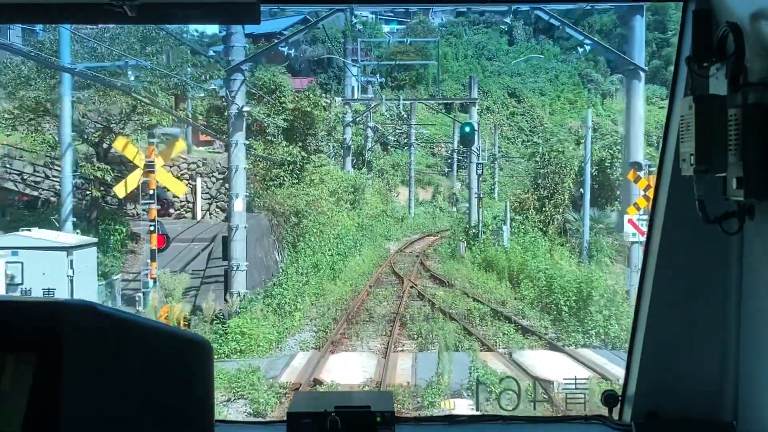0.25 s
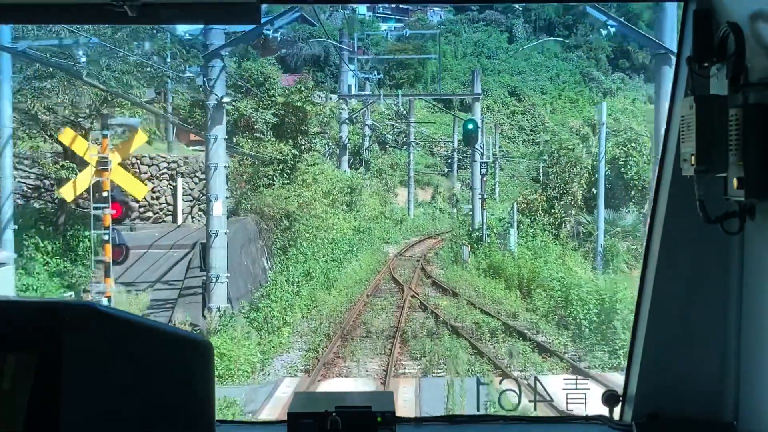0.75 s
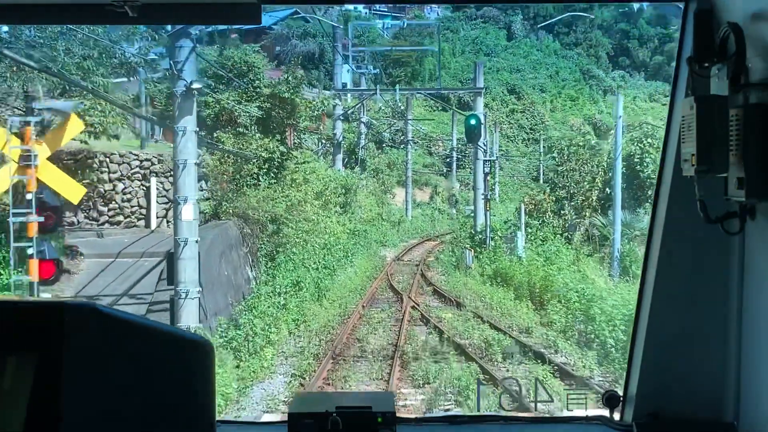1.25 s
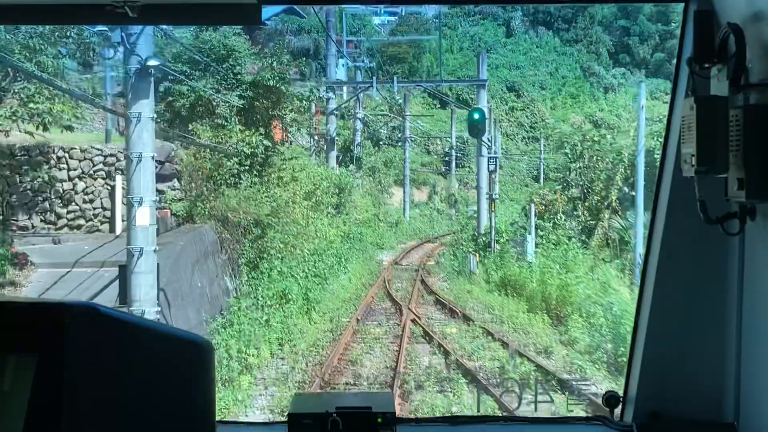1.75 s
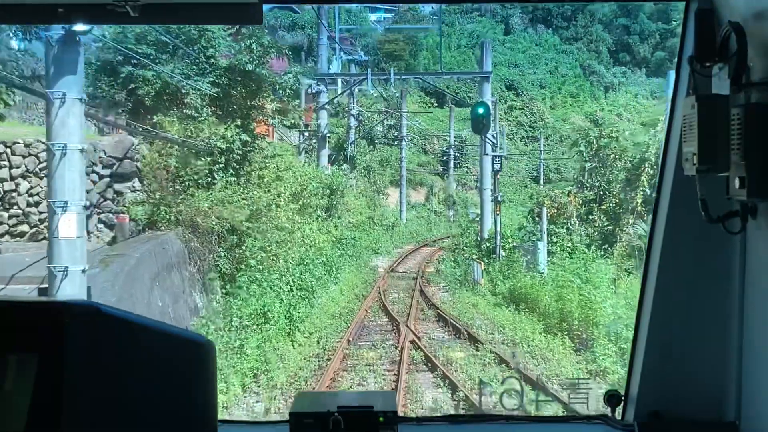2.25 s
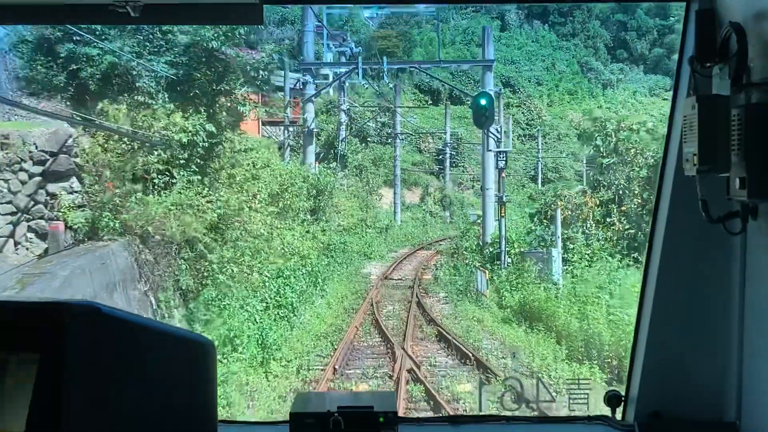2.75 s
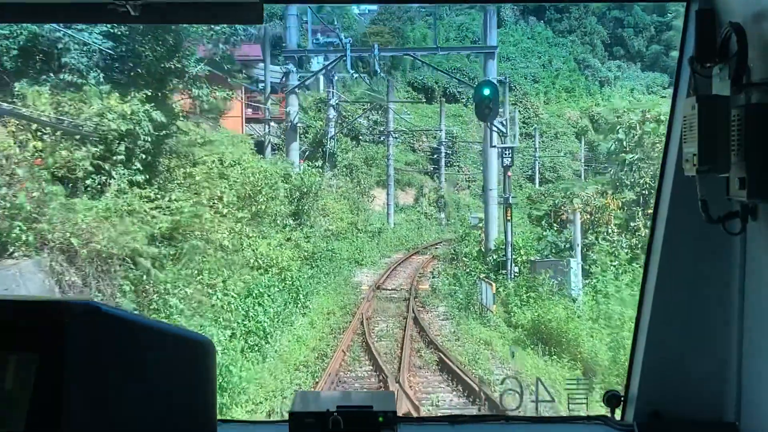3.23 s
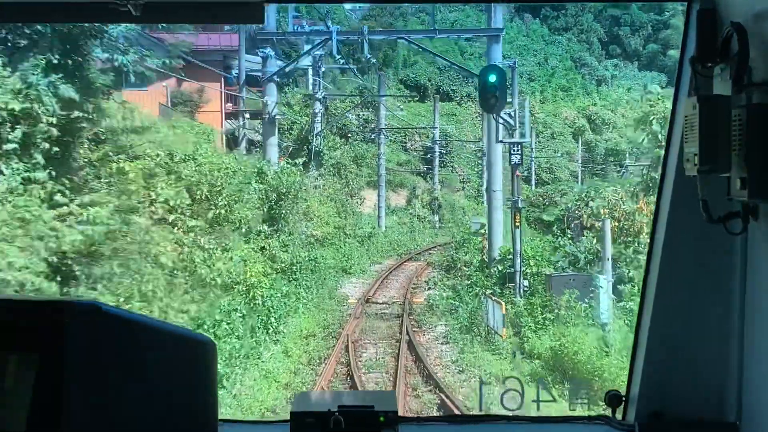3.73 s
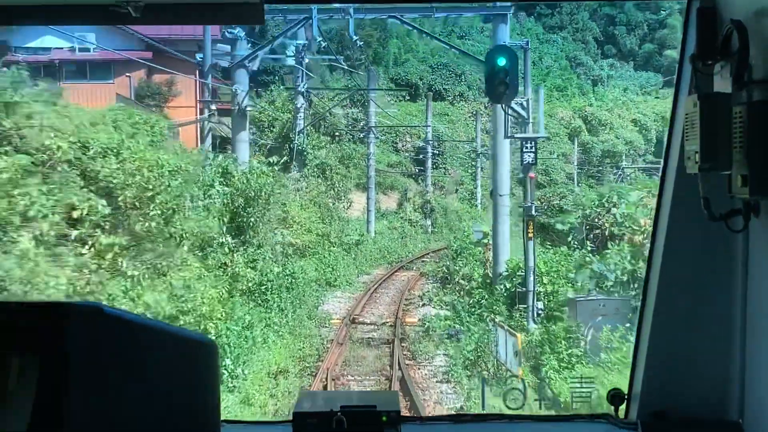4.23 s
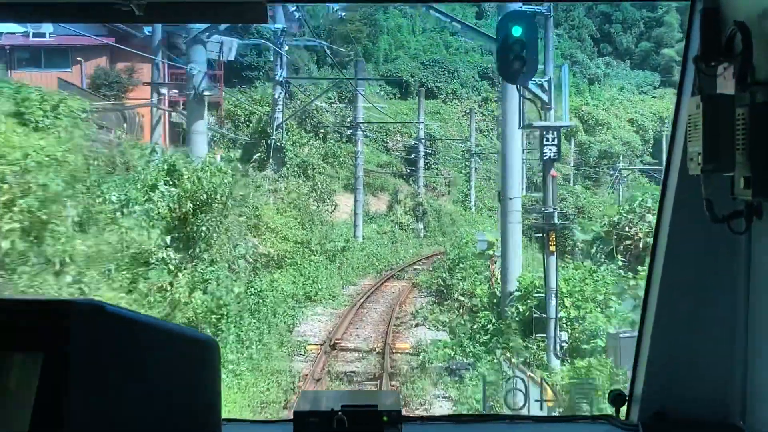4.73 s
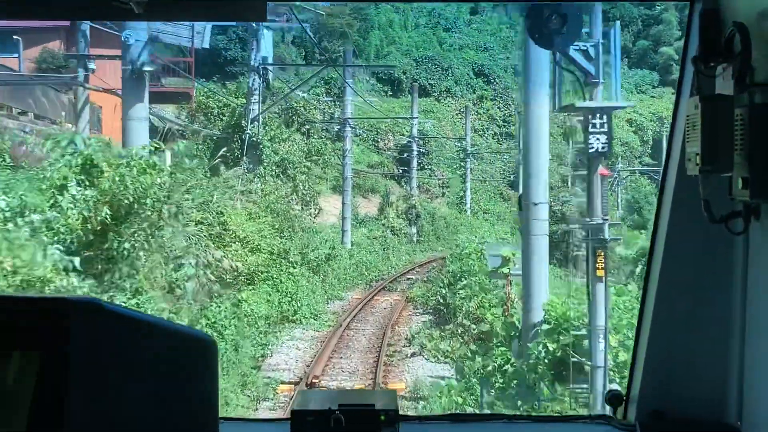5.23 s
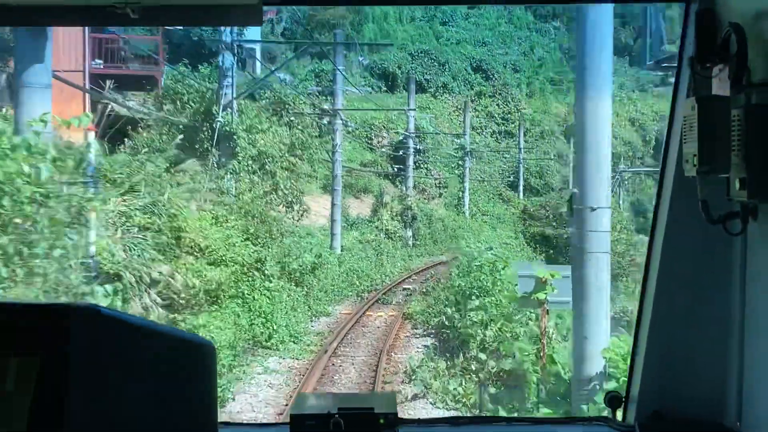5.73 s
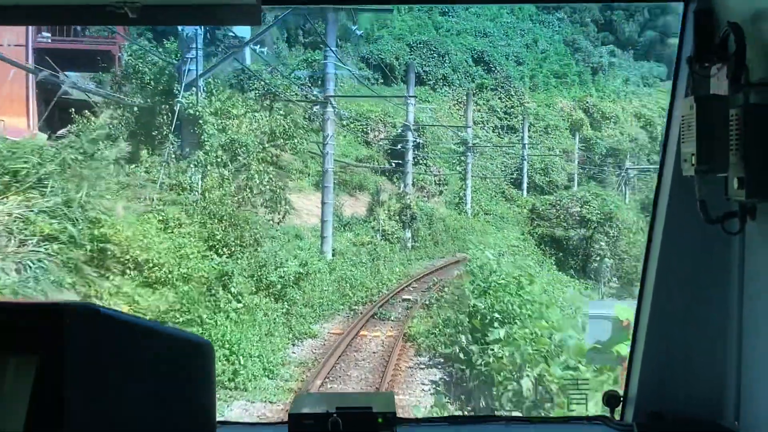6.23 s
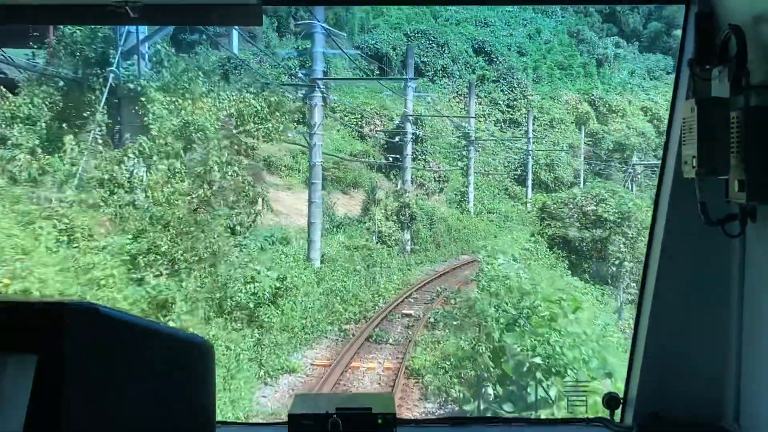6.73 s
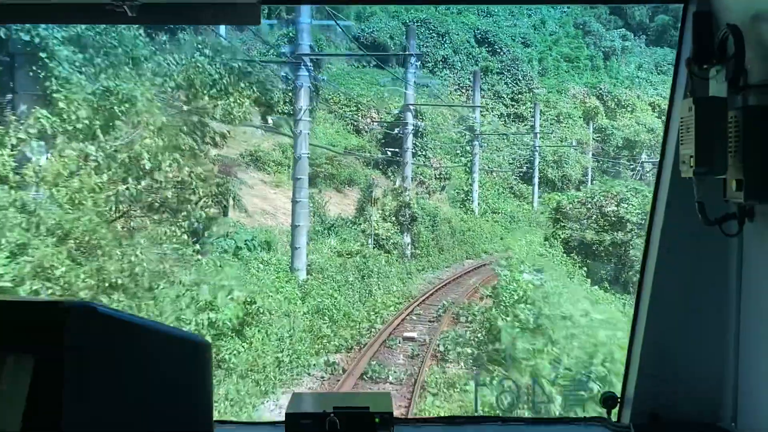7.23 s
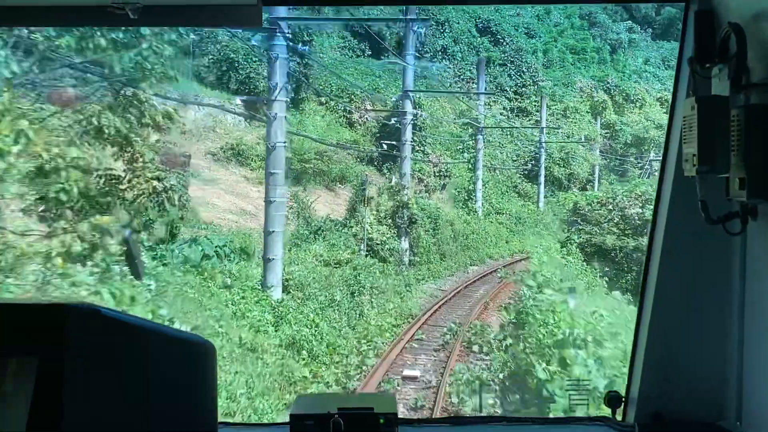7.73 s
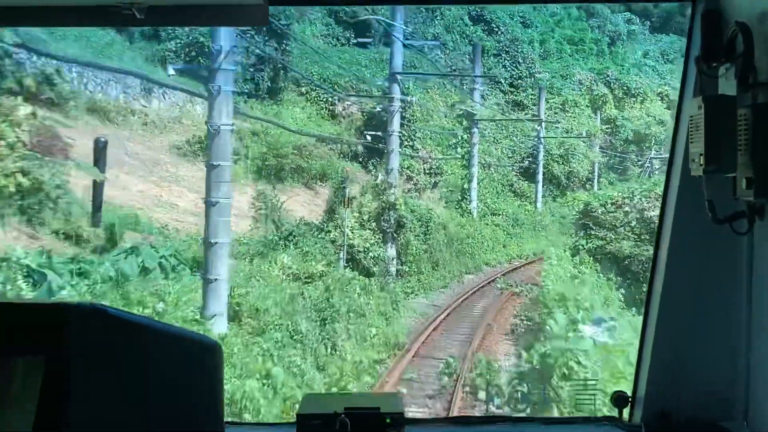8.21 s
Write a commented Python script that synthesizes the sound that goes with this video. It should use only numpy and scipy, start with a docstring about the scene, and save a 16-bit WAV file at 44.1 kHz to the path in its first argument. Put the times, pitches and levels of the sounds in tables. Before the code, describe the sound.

Inside a rolling train car, a steady low rumble and wheel roar, then heavy clunks, clatter and brief steel squeals as it crosses points.

```python
"""Inside the car behind the cab of an electric commuter train rolling over rail joints and points.
Shaped noise gives the floor boom, wheel roar, flange grinding and a thin hiss that comes and goes.
Shaken resonators give the frame shudder, the knock and wheel ring at each gap, and the whistles.
Damped sines thud in the floor; short noise snaps tick in the cab fittings."""
import sys
import numpy as np
from scipy import signal
from scipy.io import wavfile
from scipy.ndimage import uniform_filter1d

SR = 44100
rng = np.random.default_rng(int(sys.argv[2]) if len(sys.argv) > 2 else 0)


def waveform_to_disk(signal):
    """Save audio, clipped to [-1, 1], as 16-bit WAV at the path in sys.argv[1]."""
    frames = np.transpose(np.atleast_2d(signal))
    scaled = np.clip(frames, -1, 1) * 32767
    samples = np.round(scaled).astype(np.int16)
    wavfile.write(sys.argv[1], SR, samples)


N = 373527
FLOOR_HZ = 7000  # the floor muffles the blows above this


def gain_of(db):
    """Decibels to amplitude."""
    return 10 ** (np.asarray(db) / 20)


def evened(x):
    """Scales to rms 1."""
    return x / np.sqrt(np.mean(x ** 2) + 1e-20)


def read(points, hz):
    """Interpolates a spectrum table over log frequency."""
    point_hz, value = np.transpose(points)
    return np.interp(np.log(hz + 1), np.log(point_hz + 1), value)


def curve(rows, order):
    """Gain per sample from a dB column: -120 dB before the first row, last value held."""
    rows = np.array(rows)
    return gain_of(np.interp(np.arange(N) / SR, rows[:, 0], rows[:, order], left=-120))


# Likeness of the ears: hz, left_right_likeness
EAR_LIKENESS = [(60, 1), (130, 0.95), (270, 0.92), (520, 0.34), (850, 0.34), (1500, 0.08), (2200, 0.05),
                (3700, 0.053), (5300, 0.3), (6800, 0.77), (8300, 1), (12000, 1)]
# Level balance: hz, left_minus_right_db
EAR_BALANCE = [(60, -0.5), (130, -2.5), (270, 0.0), (560, 0.5), (1180, 3.5), (2470, 4), (5200, 0)]
# Phase between the ears: hz, right_against_left_rad
EAR_PHASE = [(150, 0), (420, -.4), (700, -.8), (1000, 1.4), (1500, 2.1), (2900, 3.8), (4200, 6.3),
             (5300, 9.4), (7200, 12.6), (9100, 15.7), (11200, 18.9), (13300, 22), (15300, 25.1)]


def noise(spectrum, patchy_db, modes=(), size=1024):
    """Stereo noise, mono sum at rms 1: a spectrum plus resonance peaks, with drifting patches."""
    hop = size // 2
    hz = np.fft.rfftfreq(size, 1 / SR)
    a, b, c, d, patches = rng.standard_normal((N // hop + 5, len(hz), 5)).T
    patches = uniform_filter1d(patches, size=8, axis=0)  # over frequency
    patches = evened(uniform_filter1d(patches, size=5, axis=1))  # over time
    power = gain_of(2 * read(spectrum, hz))
    for mode_hz, width_hz, db in modes:
        power = power + gain_of(2 * db) / (1 + (2 * (hz - mode_hz) / width_hz) ** 2) ** 2

    same = np.clip(read(EAR_LIKENESS, hz), -1, 1)[:, None]
    turn = np.exp(1j * read(EAR_PHASE, hz))[:, None]
    balance = gain_of(read(EAR_BALANCE, hz) / 2)[:, None]
    left, other = a + 1j * b, c + 1j * d
    right = same * turn * left + np.sqrt(1 - same ** 2) * other
    bins = np.array([left * balance, right / balance])
    bins *= np.sqrt(power)[:, None] * gain_of(patchy_db * patches)
    x = signal.istft(bins, window="cosine", nperseg=size, noverlap=size - hop)[1][:, :N]
    return x / np.sqrt(np.mean(x.mean(0) ** 2))


def shaking(size, apart):
    """Stereo white noise: a common part plus apart times a part opposite in the two ears."""
    both, sideways = rng.standard_normal((2, size))
    return both + apart * sideways * np.array([[1], [-1]])


def resonate(x, hz, width_hz):
    """Resonator on a gliding pitch: shifts hz down to zero, smooths twice, shifts back."""
    turn = np.exp(2j * np.pi * np.cumsum(hz * np.ones(x.shape[-1])) / SR)
    r = np.exp(-np.pi * width_hz / SR)
    smoothed = signal.lfilter([1], np.convolve([1, -r], [1, -r]), x / turn)
    return (turn * smoothed).real


def burst(t, rise_s, hold_until_s, t60_s):
    """Envelope: linear rise, hold, then a fade of 60 dB per t60_s."""
    return np.clip(t / rise_s, 0, 1) * gain_of(-60 * np.clip(t - hold_until_s, 0, None) / t60_s)


def add(mix, start_s, sound):
    """Adds a sound into the mix, cut at the end of the mix."""
    part = mix[..., round(start_s * SR):][..., :sound.shape[-1]]
    part += sound[..., :part.shape[-1]]


# Floor boom spectrum: hz, density_db_per_hz
BOOM_SPECTRUM = [(12, -43.5), (20, -23.5), (39, -2), (59, 13.5), (166, -3.5), (199, -48.5), (260, -5),
                 (340, -50), (570, -120)]
# Floor boom level: time_s, level_db
BOOM_LEVEL = [(0.0, -27.5), (1.18, -29.5), (1.5, -27), (1.98, -24), (2.1, -28.5), (2.62, -31), (3.04, -28),
              (3.89, -25.5), (4.25, -25), (4.62, -29), (5.1, -28), (5.38, -24), (5.8, -21), (6.25, -26),
              (6.8, -23.5), (7.15, -30.5), (7.43, -26), (8.0, -26.5), (8.19, -20.5), (8.47, -27)]
# Wheel-on-rail roar spectrum: hz, density_db_per_hz
ROAR_SPECTRUM = [(71, -7), (120, 4.5), (134, -5), (160, 1), (188, -17.5), (221, 0), (287, -8.5),
                 (306, -3.5), (496, -7.5), (546, -8), (766, -10.5), (1740, -22.5), (2080, -28.5),
                 (2330, -27.5), (5650, -49.5), (7340, -69), (12400, -120)]
# Wheel-on-rail roar level: time_s, level_db
ROAR_LEVEL = [(0, -31), (3.4, -31), (4.2, -29.5), (4.9, -30.5), (5.4, -29.5), (6.6, -30.5), (7.2, -29.5),
              (7.8, -28), (8.47, -29.5)]
# Bogie frame shudder through the points: time_s, level_db, centre_hz
FRAME_SHUDDER = [(5.1, -63, 158.5), (5.23, -28, 177), (5.52, -26.5, 145), (5.7, -27.5, 199),
                 (6.0, -41.5, 134), (6.2, -49, 143.5), (6.38, -28.5, 199), (6.7, -25.5, 163),
                 (7.0, -33, 145), (7.35, -26.5, 218), (7.52, -26, 162), (7.82, -23.5, 227),
                 (8.1, -26.5, 175), (8.22, -21.5, 202), (8.35, -24, 153), (8.47, -30, 141)]


def rolling():
    """Rough rail shakes the floor into a boom, the wheels into a roar and the frame into a shudder."""
    boom = curve(BOOM_LEVEL, order=1) * noise(BOOM_SPECTRUM, patchy_db=1.1, size=4096)
    roar = curve(ROAR_LEVEL, order=1) * noise(ROAR_SPECTRUM, patchy_db=1.0)

    time_s, _, centre_hz = np.transpose(FRAME_SHUDDER)
    glide_hz = np.interp(np.arange(N) / SR, time_s, centre_hz)
    frame = resonate(shaking(N, apart=.3), glide_hz, width_hz=210)
    frame = signal.sosfilt(signal.butter(4, FLOOR_HZ / 2, fs=SR, output="sos"), frame)
    return boom + roar + curve(FRAME_SHUDDER, order=1) * evened(frame)


# Hiss bed spectrum: hz, density_db_per_hz
HISS_SPECTRUM = [(2800, -28.5), (3800, 9), (4800, 3), (6000, -4), (7200, -8.5), (8300, -12.5), (9300, -22),
                 (10300, -33.5), (11000, -50.5)]
# Steady hiss bed: time_s, level_db
HISS_LEVEL = [(0, -62), (1.2, -61.5), (3.4, -62.5), (4.5, -60.5), (5.1, -58), (6.2, -56.5), (7.0, -59.5),
              (7.6, -53), (8.47, -53)]
# Puff spectrum: hz, density_db_per_hz
PUFF_SPECTRUM = [(2800, -13), (4000, 1), (5500, -4.5), (7200, -11), (8500, -14), (9800, -26), (11000, -49)]
# Puffs of hiss: start_s, peak_db, rise_s, hold_until_s (after start), t60_s, top_band_peak_db
HISS_PUFFS = [(.5, -60.5, 0.05, 0.062, .3, -81), (2.245, -58.5, 0.012, 0.16, 0.98, -77),
              (2.4, -55, 0.15, .26, 0.26, -70), (2.9, -61.5, 0.031, .17, 1.2, -75),
              (4.538, -52, 0.003, 0.025, 0.47, -70), (4.77, -76, .04, .06, 1.1, -93),
              (5.82, -55.5, 0.037, 0.091, 0.62, -62), (6.02, -57.5, 0.019, 0.073, 1.5, -73),
              (6.29, -64, 0.023, 0.035, 0.34, -72), (6.41, -73, .03, 0.032, 0.23, -66),
              (6.61, -59, 0.017, .035, 2.5, -69), (7.16, -61, .03, .04, .5, -72),
              (7.52, -61, 0.016, 0.11, 1, -73), (8.05, -51.5, 0.038, 0.21, 0.49, -67)]
# Uppermost noise band, 8-15 kHz: hz, density_db_per_hz
TOP_BAND_SPECTRUM = [(7500, -28), (9300, 12), (10300, 13), (11200, 12), (12300, 4.5), (13400, 1.5),
                     (14400, -14), (15500, -21.5)]
GAP_HISS_DB, GAP_HISS_T60_S = -18, 1  # hiss stirred up by each clang, relative to the clang
# top band is at TOP_BAND_DB when the bed is at the pivot, and moves TOP_BAND_STEEP dB per dB of bed
TOP_BAND_DB, TOP_BAND_PIVOT_DB, TOP_BAND_STEEP = -81.5, -58.5, 1.6


def hiss():
    """Treble noise rises at each gap and puffs up; a higher noise band follows it more steeply."""
    t = np.arange(SR // 2) / SR
    bed_power = curve(HISS_LEVEL, order=1) ** 2
    for start_s, *_, clang_db, length_s, _, _ in GAP_BLOWS:
        stirred = burst(t, 0.014, length_s, GAP_HISS_T60_S)
        add(bed_power, start_s, (gain_of(clang_db + GAP_HISS_DB) * stirred) ** 2)

    puffs = np.zeros(N)
    bed_over_pivot = bed_power / gain_of(2 * TOP_BAND_PIVOT_DB)
    top_power = gain_of(2 * TOP_BAND_DB) * bed_over_pivot ** TOP_BAND_STEEP
    for start_s, peak_db, rise_s, hold_until_s, t60_s, top_band_peak_db in HISS_PUFFS:
        puff = burst(t, rise_s, hold_until_s, t60_s)
        add(puffs, start_s, gain_of(peak_db) * puff)
        add(top_power, start_s, (gain_of(top_band_peak_db) * puff ** TOP_BAND_STEEP) ** 2)

    out = np.sqrt(bed_power) * noise(HISS_SPECTRUM, patchy_db=2.0, size=512)
    out += puffs * noise(PUFF_SPECTRUM, patchy_db=2.0, size=512)
    return out + np.sqrt(top_power) * noise(TOP_BAND_SPECTRUM, patchy_db=4.0, size=512)


# Ticks in the cab fittings: start_s, peak_db, t60_s
TICK_EVENTS = [(2.258, -51, 0.045), (4.544, -50.5, 0.13), (6.3, -47, .05), (6.447, -52, 0.033),
               (7.536, -45, 0.038), (7.614, -44.5, .05)]
# Tick spectrum: hz, density_db_per_hz
TICK_SPECTRUM = [(2500, -19), (3500, -1), (4700, 5), (6000, -8.5), (7200, -7.5), (8500, -16), (11000, -22),
                 (13000, -50)]


def ticks():
    """Short bright noise snaps with a quick tail."""
    level, t = np.zeros(N), np.arange(SR // 8) / SR
    for start_s, peak_db, t60_s in TICK_EVENTS:
        add(level, start_s, gain_of(peak_db) * burst(t, .001, 0.001, t60_s))
    return level * noise(TICK_SPECTRUM, patchy_db=-0.5, size=256)


# Whistles of steel on steel: start_s, length_s, first_hz, last_hz, rms_db
WHISTLES = [(2.28, .44, 4760, 4690, -55), (2.42, .26, 3950, 3960, -59), (2.5, .17, 5550, 5570, -62),
            (3.0, .19, 4990, 4950, -60), (3.71, .16, 3900, 3850, -52), (3.96, .16, 2790, 2800, -46),
            (3.96, .2, 3660, 3680, -49), (3.98, .26, 4450, 4400, -54), (4.1, .24, 3870, 3880, -54),
            (5.09, .11, 3570, 3630, -52), (5.25, .3, 2000, 2010, -45), (5.6, .13, 2000, 2010, -44),
            (5.62, .15, 1410, 1400, -42), (5.97, .07, 1060, 1075, -38), (5.95, .28, 1320, 1350, -38),
            (5.96, .37, 1525, 1560, -38), (6.0, .22, 1725, 1700, -36), (6.0, .22, 3780, 3760, -51),
            (5.99, .36, 2900, 2870, -46), (5.88, .14, 2000, 2050, -45), (6.0, .2, 2300, 2250, -47),
            (6.22, .2, 1950, 1970, -43), (6.54, .16, 2700, 2760, -47), (6.7, .13, 1105, 1100, -38),
            (6.75, .2, 1360, 1320, -38), (6.74, .27, 1600, 1640, -40), (6.74, .24, 1760, 1780, -43),
            (6.82, .15, 1900, 1920, -45), (7.65, .25, 1120, 1110, -43), (8.02, .1, 1120, 1120, -40)]
WHISTLE_WIDTH_HZ = 110  # widened by rattling


def whistles():
    """Gliding resonance of noise with a wavering tone inside the rasp."""
    out = np.zeros((2, N))
    for start_s, length_s, first_hz, last_hz, rms_db in WHISTLES:
        size = round(length_s * SR)
        hz = np.linspace(first_hz, last_hz, size)
        rasp = evened(resonate(shaking(size, apart=1), hz, WHISTLE_WIDTH_HZ))
        waver_rad = np.cumsum(rng.standard_normal(size)) * .035
        ears_rad = np.array([[0], [np.pi / 2]])
        tone = np.sin(2 * np.pi * np.cumsum(hz) / SR + waver_rad + ears_rad)
        whistle = evened(.75 * rasp + tone)
        add(out, start_s, gain_of(rms_db) * whistle * signal.windows.tukey(size, .8))
    return out


# Flanges bear on the rail and let go: peak_s, peak_db, swell_db_per_s, fade_db_per_s
FLANGE_RUBS = [(5.3, -44.5, 81, 39), (5.45, -40.5, 38, 68), (5.93, -40.5, 92, 37), (6.051, -27, 87, 37),
               (6.74, -42, 65, 39), (6.87, -44, 38, 59), (7.75, -42.5, 57, 35), (8.3, -33, 26, 70)]
# Rubbing spectrum: hz, density_db_per_hz
RUB_SPECTRUM = [(500, 1.5), (900, -0.5), (1600, -5.5), (2400, -13), (3000, -14), (3800, -20), (4700, -25.5),
                (6000, -52), (9000, -75.5)]
# Rail and wheel rim resonances: hz, width_hz, level_db
RAIL_MODES = [(1100, 60, 0), (1350, 45, 1), (1550, 40, 1), (1710, 35, 1), (1950, 60, -4), (2300, 70, -12),
              (2880, 90, -10), (3780, 80, -17), (4600, 80, -23)]


def flanges():
    """Rubbing noise with the narrow resonances of rail and wheel rim."""
    t = np.arange(N) / SR
    bearing = np.zeros(N)
    for peak_s, peak_db, swell_db_per_s, fade_db_per_s in FLANGE_RUBS:
        drop_db = np.maximum(swell_db_per_s * (peak_s - t), fade_db_per_s * (t - peak_s))
        bearing += gain_of(peak_db - drop_db)
    return bearing * noise(RUB_SPECTRUM, patchy_db=2.0, modes=RAIL_MODES, size=2048)


# Jolts through the floor: start_s, peak_db, pitch_hz, t60_s
FLOOR_JOLTS = [(1.18, -18.5, 68.6, 0.096), (1.618, -28, 55.7, 0.19), (1.948, -21, 72, 0.11),
               (2.219, -22.5, 87, 0.64), (4.635, -19.5, 95, 0.074), (5.38, -20, 80, 0.13),
               (5.497, -19.5, 110, 0.19), (5.661, -18, 90, 0.24), (5.852, -12, 59, 0.55),
               (5.971, -10.5, 54.7, 0.21), (6.2, -15.5, 58, 0.21), (6.351, -29, 51, 0.67),
               (6.469, -20, 92.6, 0.44), (6.713, -20.5, 132, 0.13), (6.825, -19, 139.7, 0.31),
               (7.134, -18, 40.6, 0.27), (8.079, -10, 66.4, 0.073), (8.171, -12.5, 149, 0.16),
               (8.43, -16.5, 77.3, 0.68)]


def thuds():
    """Damped swings of the floor, a little sharper at the start."""
    out, t = np.zeros(N), np.arange(SR // 2) / SR
    for start_s, peak_db, pitch_hz, t60_s in FLOOR_JOLTS:
        cycles = pitch_hz * t + 0.38 * (1 - np.exp(-t / 0.045))
        swing = np.sin(2 * np.pi * cycles)
        add(out, start_s, gain_of(peak_db) * swing * burst(t, 0.0071, 0.021, t60_s))
    return out


# Wheels over gaps: start_s, knock_peak_db, knock_hz, knock_width_hz, clatter_db, clang_db,
# length_s, ring_db, ring_tilt_db_per_octave
GAP_BLOWS = [(1.596, -30, 390, 120, -31.5, -42, 0.045, -41, -3),
             (1.924, -40, 302, 120, -27.5, -41, 0.051, -33.5, -1),
             (3.584, -22.5, 194, 121, -33.5, -45, 0.071, -39, -3.5),
             (3.717, -16.5, 353, 130, -23.5, -38.5, 0.061, -32, -6.5),
             (3.977, -15, 318, 130, -21.5, -38, 0.044, -28.5, -4),
             (4.984, -17, 397, 129, -31, -43, 0.038, -31.5, -4.5),
             (5.214, -17.5, 330, 198, -24, -38, 0.038, -30.5, -4),
             (5.365, -13, 382, 149, -20.5, -36, 0.027, -37, -6),
             (5.59, -8, 328, 110, -19.5, -36, 0.041, -36, -1),
             (6.298, -17, 298, 120, -34, -39, 0.049, -33, -1.5),
             (6.498, -18.5, 221, 150, -19.5, -33.5, 0.046, -34, 3),
             (6.818, -20, 416, 120, -27, -43, 0.025, -50, 9),
             (7.051, -18, 454, 120, -27, -40.5, 0.012, -47, 2),
             (7.25, -25, 320, 150, -28.5, -39.5, 0.08, -38, -3),
             (7.65, -22, 267, 150, -25, -36.5, 0.022, -36, 1.5),
             (7.982, -11, 240, 171, -27.5, -37, 0.068, -39.5, 4),
             (8.043, -13.5, 394, 220, -50, -54, 0.065, -45, 5),
             (8.161, -9, 265, 148, -19.5, -38, 0.045, -31, 5)]
# Wheel modes before detuning and smear: hz, width_hz, level_db
WHEEL_MODES = [(795, 60, 4), (1394, 100, 4), (1580, 70, -2), (1985, 120, 1), (2310, 90, -6),
               (2660, 120, -5), (2820, 150, 1), (3660, 150, -5), (3880, 100, -7), (4430, 220, -5),
               (4650, 130, -11)]
# Clatter spectrum of loose parts: hz, density_db_per_hz
CLATTER_SPECTRUM = [(250, 4.5), (450, 3), (800, -0.5), (1300, -11), (2000, -31.5), (4000, -57.5),
                    (9000, -81)]
# Clang spectrum of loose parts: hz, density_db_per_hz
CLANG_SPECTRUM = [(700, -17), (1300, 3.5), (1900, -2), (2400, -11), (2900, -12), (3300, -17.5), (4500, -16),
                  (6000, -48.5), (12000, -81), (13500, -73.5)]
RING_T60_S, RING_SMEAR = .6, 1.7  # rattling widens the wheel modes by RING_SMEAR


def wheel_ring(size, tilt_db):
    """Shaken wheel modes; each blow favours other modes, slightly detuned."""
    shake = shaking(size, apart=1)
    ring = np.zeros((2, size))
    for hz, width_hz, db in WHEEL_MODES:
        favour, detune = rng.standard_normal(2)
        mode = evened(resonate(shake, hz * (1 + .015 * detune), RING_SMEAR * width_hz))
        ring += gain_of(db + 3 * favour + tilt_db * np.log2(hz / 2000)) * mode
    return evened(ring)


def gaps():
    """Each gap: a knock in the bogie frame, clatter and clang of loose parts, and ringing wheels."""
    out, t = np.zeros((2, N)), np.arange(SR // 4) / SR
    clatter, clang = np.zeros((2, N))
    end_fade = np.clip((t[-1] - t) / 0.046, 0, 1)
    for start_s, knock_db, hz, width_hz, clatter_db, clang_db, length_s, ring_db, tilt_db in GAP_BLOWS:
        knock = resonate(shaking(len(t), apart=0.32), hz, width_hz)
        knock = knock * burst(t, 0.0089, length_s, 0.23)
        add(out, start_s, gain_of(knock_db) * knock / abs(knock.mean(0)).max())
        add(clatter, start_s, gain_of(clatter_db) * burst(t, 0.0079, length_s, 0.27))
        add(clang, start_s, gain_of(clang_db) * burst(t, 0.0046, length_s / 2, 0.46))
        ring = wheel_ring(len(t), tilt_db) * burst(t, 0.025, length_s / 2, RING_T60_S)
        add(out, start_s, gain_of(ring_db) * ring * end_fade)

    # loose parts strike unevenly
    chatter = gain_of(1.5 * evened(uniform_filter1d(rng.standard_normal(N), size=300)))
    loose = clatter * noise(CLATTER_SPECTRUM, patchy_db=2.)
    loose = loose + clang * noise(CLANG_SPECTRUM, patchy_db=2.5, size=512)
    floor = signal.butter(8, FLOOR_HZ, fs=SR, output="sos")
    return signal.sosfilt(floor, out + chatter * loose)


def scene():
    """Sum of all sources."""
    return rolling() + hiss() + ticks() + whistles() + flanges() + thuds() + gaps()


EDGE_HZ = 15700


def record(dry):
    """Band limit: linear-phase low-pass at EDGE_HZ."""
    lowpass = signal.firwin(511, EDGE_HZ, window=("kaiser", 9), fs=SR)
    return signal.oaconvolve(dry, lowpass[None], "same")


dry = scene()
out = record(dry)
waveform_to_disk(out)
```